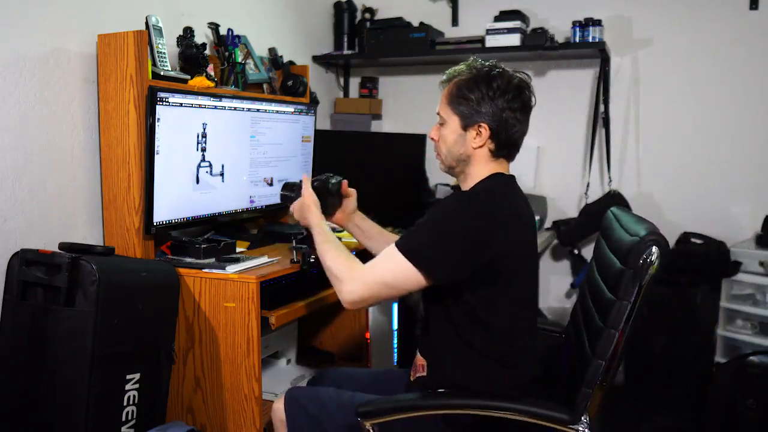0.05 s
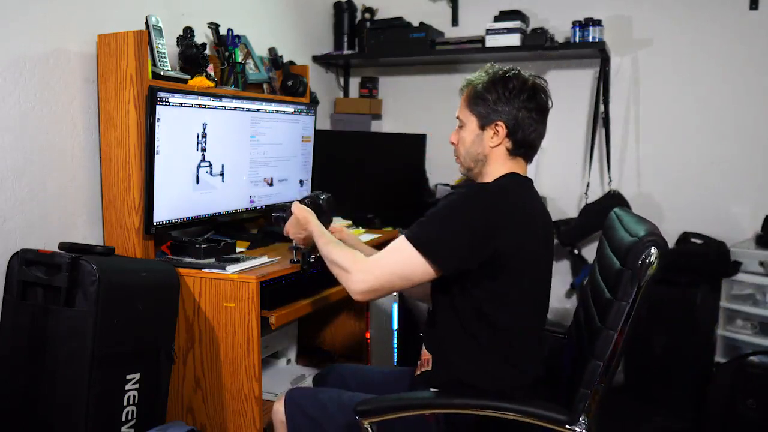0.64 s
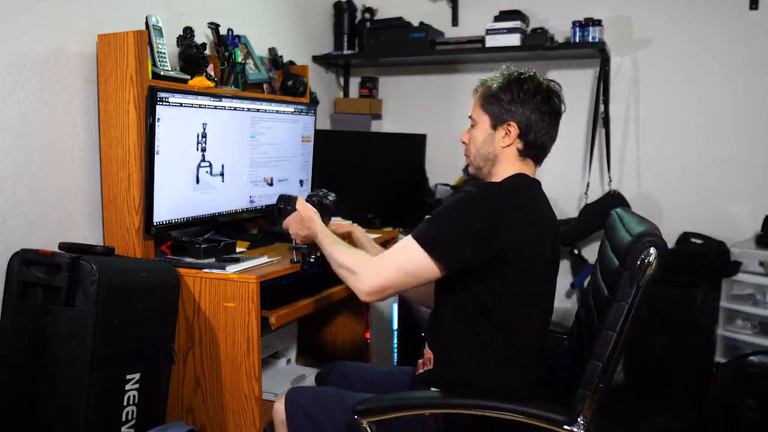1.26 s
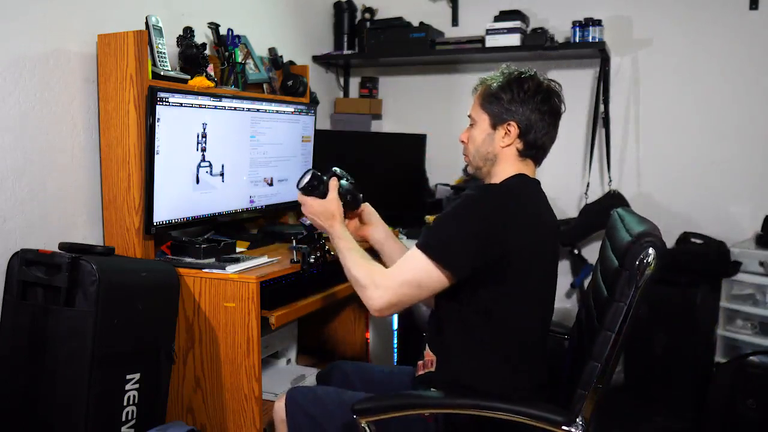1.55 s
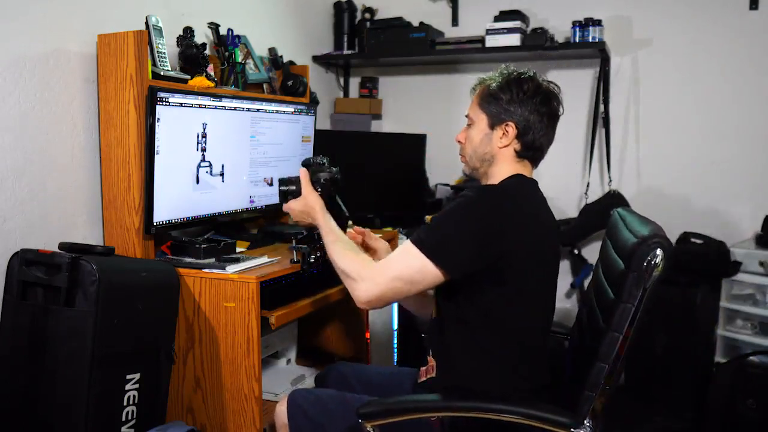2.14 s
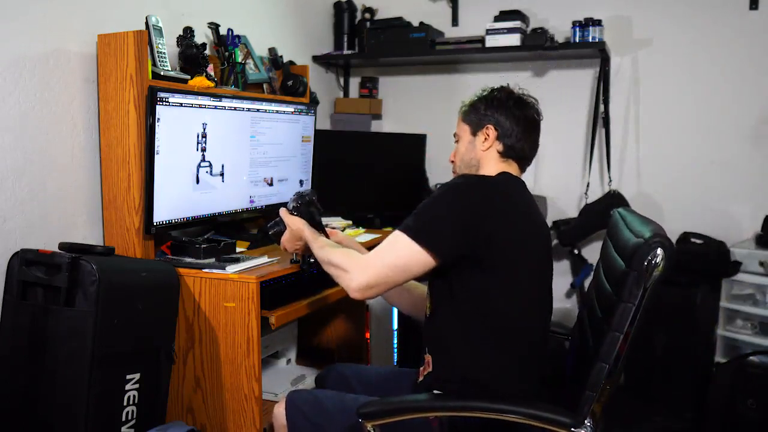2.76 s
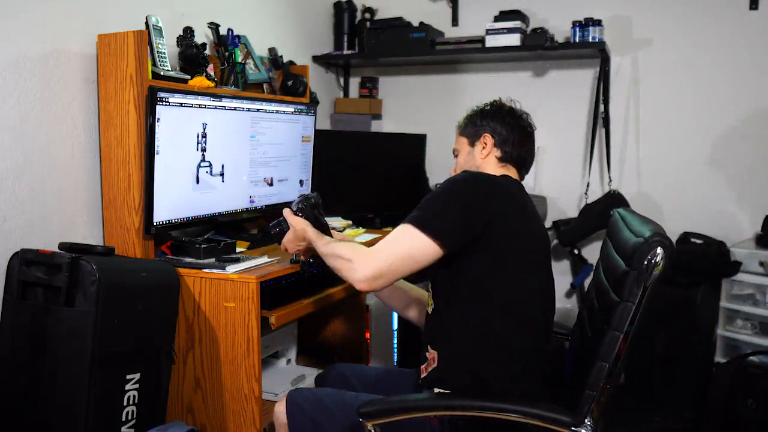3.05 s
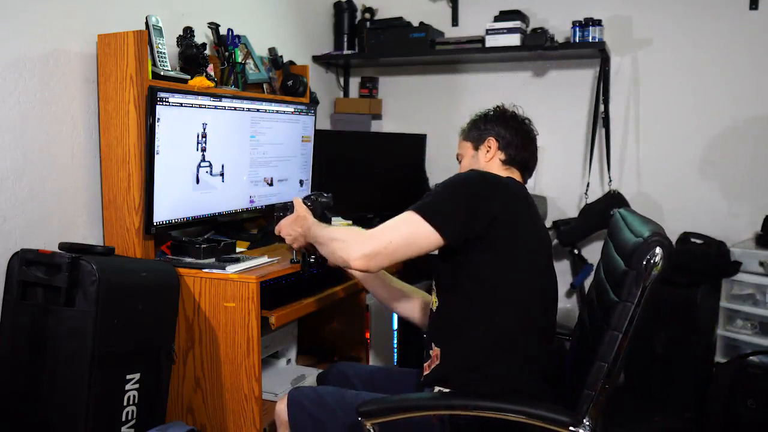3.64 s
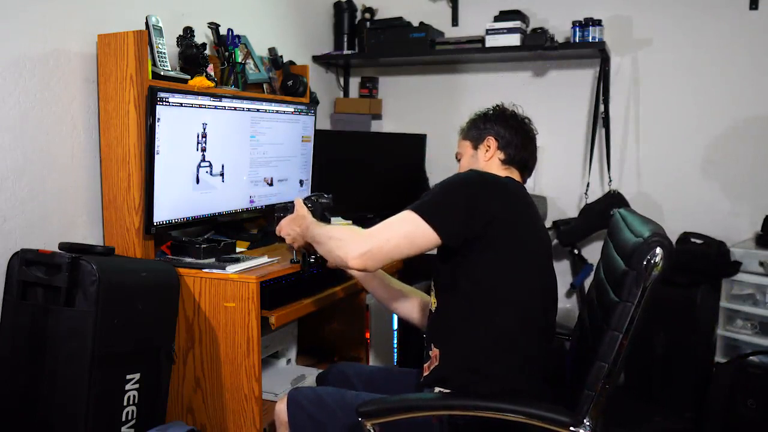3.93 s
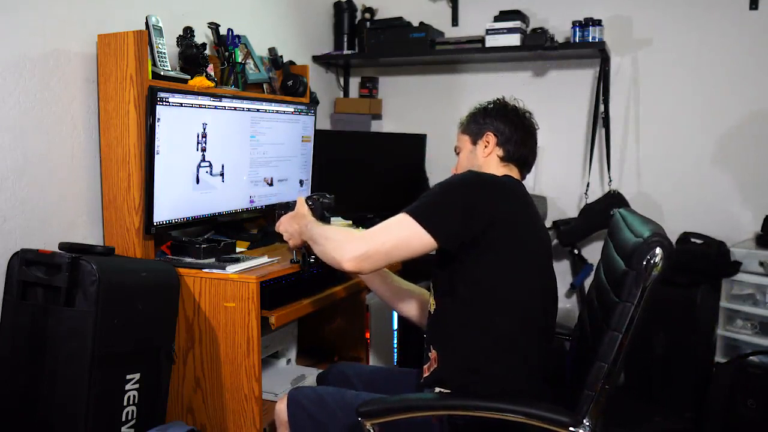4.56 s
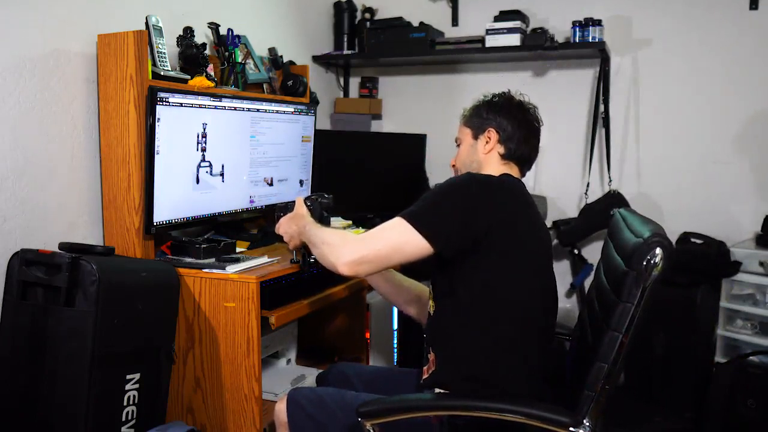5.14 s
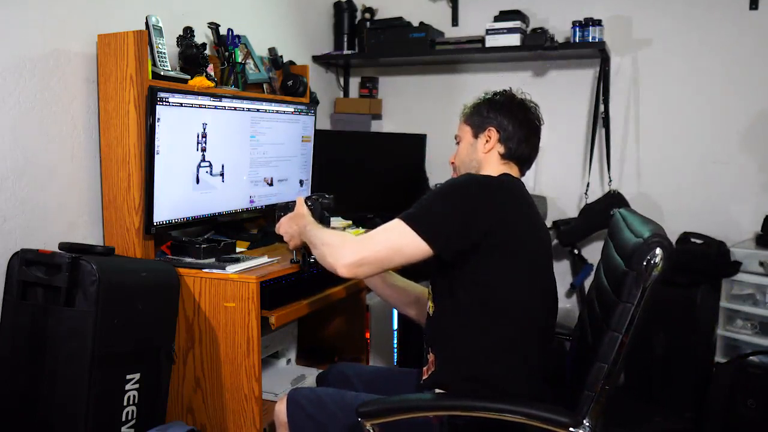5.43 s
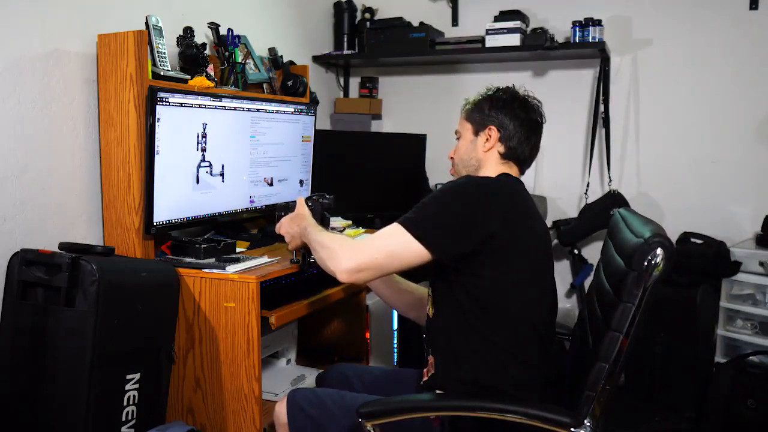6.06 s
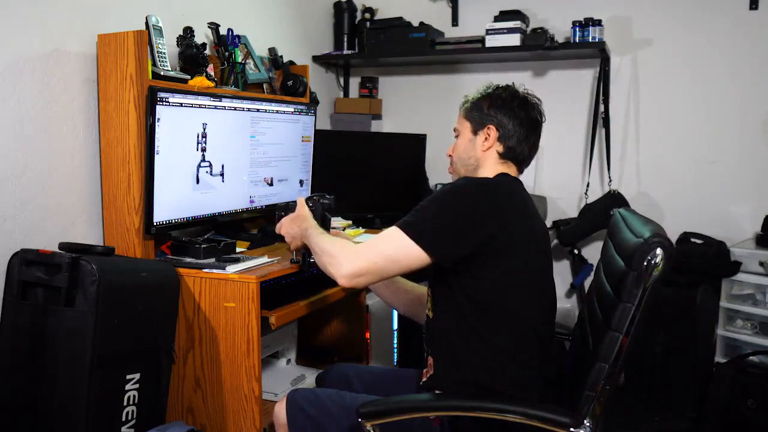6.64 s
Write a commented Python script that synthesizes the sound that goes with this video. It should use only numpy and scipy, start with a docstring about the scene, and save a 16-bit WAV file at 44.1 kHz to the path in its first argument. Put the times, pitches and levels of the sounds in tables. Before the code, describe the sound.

A camera is handled and knocked onto a small desk stand, then screwed down with short scrapes and clicks over a low computer hum.

```python
"""Fingers brush a camera, then it knocks onto a small stand on a wooden desk in a small room.
It is lifted, seated again and screwed down. Each impact excites damped modes: a tick at the edges,
a clack in the plastic body, a thud through stand and desk. Stick-slip friction makes the body creak,
the base groan as it slides home and the screw scrape in short turns. A computer hums underneath."""
import sys
import numpy as np
from scipy import signal
from scipy.fft import rfft, irfft, next_fast_len
from scipy.io import wavfile
from scipy.ndimage import uniform_filter1d

SR = 44100
rng = np.random.default_rng(int(sys.argv[2]) if len(sys.argv) > 2 else 0)


def master(y):
    """Save y as 16-bit WAV."""
    cut = np.clip(np.atleast_2d(y).T, -1, 1)
    pcm = np.round(cut * 32767)  # scale
    wavfile.write(sys.argv[1], SR, pcm.astype(np.int16))


N = 303849
TIME = np.arange(N) / SR

# Spectra of the plastic shell, hard edges and shaken stand. Each row: frequency in Hz, density in dB.
SHELL_SPECTRUM = [(300, -13), (700, 0), (1000, 6), (1400, 4), (1900, -5.5), (2400, -2), (3200, -8.5),
                  (4200, -12), (5500, -28), (7000, -19), (11000, -48), (16000, -61)]
TICK_SPECTRUM = [(1000, -57), (3000, 10), (5000, 5.5), (6600, -2.5), (8000, 4.5), (9700, 4.5), (11000, 0),
                 (14000, 5), (16000, -10)]
RUMBLE_SPECTRUM = [(50, -41), (110, 0), (170, -6.5), (260, -3), (340, 2.5), (400, -3), (490, -1.5),
                   (650, -11.5), (850, -13), (1500, -31.5), (16000, -83)]


def impacts(shake_db=-14.5, shake_rise_s=0.0027, thud_lag_s=0.00204):
    """Impulsive excitation: knocks and clicks give low thuds and bright clacks, returned separately."""
    # Camera on stand. Each row: start in seconds, thud level in dB, thud centre in Hz, clack level in dB,
    # tick level in dB, tick cutoff in Hz, clack T60 in seconds.
    knocks = [(0.5004, -24.5, 253, -33, -39, 10500, 0.034), (0.5419, -35.5, 262, -44, -50, 10100, 0.083),
              (0.7611, -40.5, 435, -42.5, -53.5, 8900, 0.016), (0.823, -44.5, 348, -53, -80, 9100, .045),
              (.895, -45, 404, -60, -78, 9000, 0.033), (.934, -42, 376, -63, -65, 10000, 0.039),
              (0.9538, -51, 312, -45.5, -53.5, 9400, 0.035), (0.979, -36, 310, -41, -70, 9100, 0.024),
              (3.1392, -29.5, 364, -34.5, -46.5, 8000, 0.025), (3.2, -41.5, 376, -56.5, -78, 10000, .025),
              (3.4105, -47, 400, -56, -78, 14000, .05), (3.468, -38.5, 360, -49.5, -58, 9600, 0.023),
              (3.7213, -23, 464, -30, -42, 11600, 0.052), (3.7471, -49, 368, -31.5, -65, 11000, 0.035),
              (3.7553, -28.5, 335, -31, -45.5, 10200, 0.043), (4.0787, -51, 450, -64, -70, 13000, .026),
              (4.4338, -41.5, 415, -46.5, -60, 10500, 0.029), (4.7949, -41, 392, -45, -54, 10600, 0.033),
              (5.0998, -39.5, 300, -41, -55.5, 11400, 0.073), (5.2795, -52, 305, -53, -69, 13000, 0.052),
              (5.3709, -47, 363, -47, -59, 12100, 0.044), (5.4396, -49, 357, -52, -70, 13000, 0.063),
              (5.5036, -37, 397, -33, -48, 12900, 0.025), (6.2885, -60, 413, -50, -74, 10300, 0.064),
              (6.3396, -42.5, 264, -58, -82, 9000, .034)]
    # The camera's own parts. Each row: start in seconds, clack level in dB, clack centre in Hz,
    # tick level in dB, clack T60 in seconds.
    clicks = [(.402, -54.5, 1570, -82, 0.074), (.639, -49, 1410, -49, 0.012),
              (.657, -53.5, 1500, -63, 0.0074), (1.3484, -75, 2010, -66, .025),
              (1.3717, -56.5, 2480, -59.5, 0.023), (1.4528, -46, 1230, -65, 0.034),
              (1.6034, -56.5, 1400, -59.5, 0.024), (1.6903, -55, 1500, -56.5, 0.015),
              (1.8229, -41.5, 1250, -43.5, 0.0096), (1.846, -43, 1400, -53.5, .08),
              (1.9162, -73, 1600, -58.5, .017), (2.135, -35.5, 1360, -52.5, 0.0057),
              (2.9034, -57.5, 1340, -68, 0.0092), (3.179, -56, 1300, -59, .03),
              (3.762, -45, 1400, -45.5, 0.027), (4.0347, -56.5, 1630, -63.5, 0.014),
              (6.3655, -55, 1680, -76, 0.039)]
    # The whole desk shaking. Each row: frequency in Hz, relative level in dB, T60 in seconds.
    frame_modes = [(81.4, 0, 0.17), (126.4, -1, 0.15), (169.4, -2.5, 0.19)]
    t = np.arange(SR // 4) / SR
    low, bright = np.zeros(N), np.zeros(N)
    for start, thud_db, thud_hz, clack_db, tick_db, top_hz, t60 in knocks:
        shake = unit(ring(frame_modes, t) * (1 - np.exp(-t / shake_rise_s)), 0.042)
        desk = thud(t, thud_hz) + from_db(shake_db) * shake
        add(low, start + thud_lag_s, from_db(thud_db) * desk)  # the blow first travels down the stand
        add(bright, start, from_db(clack_db) * clack(t, t60, centre_hz=1420))
        add(bright, start, from_db(tick_db) * tick(t, t60, top_hz))
    for start, clack_db, clack_hz, tick_db, t60 in clicks:
        desk = thud(t, centre_hz=378) * np.exp(-t / t60)
        add(low, start, from_db(clack_db - 5.5) * desk)  # little of a click reaches the desk
        add(bright, start, from_db(clack_db) * clack(t, t60, clack_hz))
        add(bright, start, from_db(tick_db) * tick(t, t60, top_hz=12200))
    return low, bright


def thud(t, centre_hz, focus=2.46, rise_cycles=1.11, loose_t60=0.065, damp_s=0.07):
    """Modal response: a blow favours the desk's modes near its centre frequency; loose parts blur it."""
    # Stand and desk top. Each row: frequency in Hz, relative level in dB, T60 in seconds.
    desk_modes = [(171, -16, 0.07), (208, -10.5, 0.061), (255.4, 6, 0.046), (327.3, -3, 0.084),
                  (375.3, -3.5, 0.063), (458, 3, 0.047), (505, -16.5, 0.17), (594, -16, 0.12),
                  (792, -9.5, 0.19), (1117, -5.5, 0.044)]
    ratio = np.array(desk_modes)[:, 0] / centre_hz
    weight_db = -10 * np.log10(1 + (focus * (ratio - 1 / ratio)) ** 2)
    wood = unit(ring(desk_modes, t, weight_db), 0.02)
    rattle = colour(rng.standard_normal(len(t)), RUMBLE_SPECTRUM, np.sqrt(centre_hz / 340))
    loose = unit(rattle * from_db(-60 * t / loose_t60), 0.017)
    swell = 1 - np.exp(-(t * centre_hz / rise_cycles) ** 2)
    held = from_db(-9) + np.exp(-(t / damp_s) ** 2)  # the hands soon damp most of the motion
    return unit((wood + from_db(-12) * loose) * swell * held, 0.017)


def clack(t, t60, centre_hz, head_db=-6, head_rise_s=0.00095):
    """Coupled vibration: the plastic shell is struck and the stand's head answers with a short ring."""
    # The head alone. Each row: frequency in Hz, relative level in dB, T60 in seconds before added damping.
    head_modes = [(1167, -1.5, 0.049), (1380, 7, 0.025), (1475, 4, 0.042), (1610, -2.5, 0.06),
                  (2187, -8.5, 0.13)]
    shell = unit(crack(t, t60, SHELL_SPECTRUM, np.sqrt(centre_hz / 1600)), 0.0052)
    envelope = (1 - np.exp(-t / head_rise_s)) * np.exp(-t / t60)
    head = unit(ring(head_modes, t) * envelope, 0.0026)
    return shell + from_db(head_db) * head


def tick(t, clack_t60, top_hz):
    """Brief contact has a wide spectrum: hard edges give a bright tick that dies sooner than the clack."""
    lowpass = signal.butter(3, min(top_hz / SR * 2, 0.9))
    edges = crack(t, 0.77 * clack_t60, TICK_SPECTRUM)
    return unit(signal.lfilter(*lowpass, edges), 0.0063)


def crack(t, t60, spectrum, shift=1):
    """High modal density: after an impulse, a small part's crowded modes act as decaying noise."""
    burst = rng.standard_normal(len(t)) * from_db(-60 * t / t60)
    burst[0] += 0.33
    return colour(burst, spectrum, shift)


def clinks(plate_rise_s=0.0066):
    """Free vibration of struck metal: the screw pings at once and the plate swells after it."""
    # Metal strikes metal. Each row: start in seconds, level in dB.
    strikes = [(.5015, -37), (3.7215, -65)]
    # Screw and plate. Each row: frequency in Hz, relative level in dB, T60 in seconds.
    screw_modes = [(2950, -12, 0.07), (3770, -1, 0.035), (4780, 9, 0.019), (5950, -9, .04),
                   (7800, 4.5, 0.022)]
    plate_modes = [(628, -6, 0.14), (786, -1, 0.11), (860, -5, 0.09), (1038, -13.5, 0.12)]
    t, out = np.arange(SR // 4) / SR, np.zeros(N)
    for start, db in strikes:
        plate = unit(ring(plate_modes, t) * (1 - np.exp(-t / plate_rise_s)), 0.014)
        ping = unit(ring(screw_modes, t), 0.0086)
        add(out, start, from_db(db) * (ping + plate))
    return out


def groan(jitter=0.04, flutter_db=1):
    """Stick-slip oscillation near a mode of the stand gives a short, shaky, nearly pure tone."""
    # The base on the plate. Each row: time in seconds, level in dB, slips per second.
    slip_curve = [(3.407, -50, 420), (3.417, -36, 385), (3.44, -38, 335), (3.462, -34, 350),
                  (3.478, -29, 330), (3.495, -39, 335), (3.507, -37, 345), (3.524, -52, 325)]
    times, _, hz = np.transpose(slip_curve)
    cycles = np.cumsum(np.interp(TIME, times, hz) * (1 + jitter * drift(110))) / SR
    phase = 2 * np.pi * cycles
    overtones = sum(from_db(-12.5 - 5 * k) * np.sin(k * phase) for k in range(2, 8))
    tone = unit(np.sin(phase) + overtones) * from_db(flutter_db * drift(60))
    return tone * level(slip_curve)


def base_and_screw(rumble_db=-1.5, slide_scrape_db=-19.5, grit_db=1.5):
    """Sliding friction: the moving base and each twist of the screw shake the stand and rasp the plate."""
    # Hand movements. Each row: start, swell and fade in seconds, relative level in dB.
    slides = [(.8, 0.13, 0.085, -42), (3.37, 0.092, 0.052, -40.5), (3.64, 0.076, 0.072, -35),
              (4.0, .08, 0.049, -54)]
    twists = [(4.241, 0.012, 0.066, -48), (4.35, 0.012, 0.24, -68), (4.63, 0.027, 0.13, -53.5),
              (4.97, 0.077, 0.11, -53), (5.346, 0.024, 0.043, -52), (5.42, 0.043, 0.059, -48.5),
              (5.71, .1, 0.074, -53.5), (6.139, 0.033, 0.052, -53), (6.23, 0.049, 0.037, -50.5),
              (6.4, 0.016, .11, -60.5), (6.68, 0.062, 0.027, -60.5)]
    sliding = strokes(slides)
    # The stand settles more slowly than the twist that shakes it.
    shaking = strokes([(start, swell, 1.6 * fade, db + 1.5) for start, swell, fade, db in twists])
    rumble = unit(colour(grains(per_s=700, spread_db=1), RUMBLE_SPECTRUM)) * (sliding + shaking)
    base = from_db(slide_scrape_db) * sliding * rasp()  # flat faces rumble more than they rasp
    screw = sum(strokes([twist]) * rasp(wander=0.03) for twist in twists)
    grit = unit(from_db(grit_db * drift(29)))  # the thread catches and runs free
    return from_db(rumble_db) * rumble + (base + screw) * grit


def rasp(wander=0):
    """Forced resonance: metal slips ring the plate, whose modes the hand's pressure shifts a little."""
    # Metal slipping on metal. Each row: frequency in Hz, density in dB.
    scrape_spectrum = [(200, -37), (500, -5.5), (700, -10), (1150, -2), (1500, 1), (1800, -10),
                       (2100, -3.5), (3400, -11.5), (5600, -23.5), (6700, -29), (8500, -28.5), (11000, -22),
                       (16000, -40)]
    # The plate. Each row: frequency in Hz, bandwidth in Hz, gain in dB relative to the plain slips.
    resonances = [(803, 44, 19.5), (1430, 170, 2), (2506, 26, 12.5), (3660, 96, -7), (5080, 67, 9),
                  (8960, 390, 7)]
    slips = colour(grains(per_s=1500, spread_db=3.6), scrape_spectrum)
    shifts = 1 + wander * rng.uniform(-0.73, 1, len(resonances))
    plate = sum(from_db(db) * resonate(slips, hz * shift, width)
                for (hz, width, db), shift in zip(resonances, shifts))
    return unit(slips + plate)


def knob(t60=0.024):
    """Sudden release: the screw's plastic knob slips from the fingers with a dry, bright snap."""
    # Releases. Each row: start in seconds, level in dB.
    snaps = [(4.4337, -45.5), (4.7952, -39)]
    # The knob's response. Each row: frequency in Hz, density in dB.
    knob_spectrum = [(2000, -7), (3400, -6), (4100, -7), (4600, -13), (5200, -9), (5800, -17), (6600, -30),
                     (16000, -33)]
    t, out = np.arange(SR // 10) / SR, np.zeros(N)
    for start, db in snaps:
        add(out, start, from_db(db) * unit(crack(t, t60, knob_spectrum), 0.0063))
    return out


def creak(slips_per_s=330, unevenness=0.65):
    """Stick-slip under the grip: an uneven pulse train rings two modes of the plastic shell."""
    # The creak's envelope. Each row: time in seconds, level in dB.
    envelope = [(1.824, -60), (1.837, -39.5), (1.853, -40), (1.867, -42), (1.882, -69)]
    cycles = np.cumsum(slips_per_s * np.exp(unevenness * drift(300))) / SR
    slips = np.diff(np.floor(cycles), prepend=0) * rng.uniform(0.73, 1, N)
    low_mode = resonate(slips, hz=1330, width_hz=350)
    high_mode = resonate(slips, hz=2250, width_hz=350)
    return unit(colour(low_mode - from_db(-2) * high_mode, SHELL_SPECTRUM)) * level(envelope)


def squeaks(rise_share=0.098):
    """Friction noise drives one resonance per squeak, swelling quickly and fading."""
    # Sliding parts. Each row: start and length in seconds, frequency and bandwidth in Hz, level in dB.
    rubs = [(0.4, .06, 7400, 600, -78), (.398, .046, 10500, 1400, -70.5), (.868, 0.2, 2530, 300, -69),
            (1.962, 0.12, 3750, 200, -78), (2.747, 0.03, 2250, 400, -63.5),
            (3.435, 0.066, 2170, 400, -61.5), (3.691, 0.029, 1700, 1400, -54.5),
            (4.254, 0.018, 5600, 600, -64), (4.267, 0.063, 1360, 700, -50.5),
            (5.435, 0.018, 5100, 200, -64), (5.496, 0.019, 3170, 2980, -53),
            (5.767, 0.08, 2750, 900, -64.5), (6.279, 0.022, 9100, 1200, -65.5)]
    out = np.zeros(N)
    for start, length, hz, width, db in rubs:
        progress = np.linspace(0, 1, int(length * SR))
        friction = rng.standard_normal(SR)[:len(progress)]
        tone = resonate(resonate(friction, hz, width), hz, width)
        envelope = (1 - np.exp(-progress / rise_share)) * (1 - progress)
        add(out, start, from_db(db) * unit(tone * envelope))
    return out


def fingers(swish_gain_db=0.5, hiss_gain_db=-1, swell_share=0.36, fade_share=0.38):
    """Roughness noise: skin brushing textured plastic makes a soft, grainy swish and a thin hiss."""
    # Finger strokes. Each row: start and nominal length in seconds, relative swish and hiss levels in dB.
    brushes = [(0, 0.023, -52, -81), (0.079, 0.045, -50, -53.5), (0.204, 0.024, -54.5, -63),
               (0.225, 0.023, -56, -62), (0.404, 0.035, -61, -78), (0.438, 0.18, -60.5, -69),
               (0.574, 0.091, -64, -79), (1.274, 0.038, -65, -64), (1.403, .05, -63, -83),
               (1.456, 0.042, -64, -59.5), (1.493, 0.061, -58, -67), (1.637, 0.041, -63, -61.5),
               (1.87, 0.22, -62.5, -71), (2.043, 0.042, -64.5, -70), (2.112, 0.073, -56, -63),
               (2.2, 0.089, -60.5, -73), (2.48, 0.049, -79, -69), (3.299, 0.041, -57, -60)]
    # Rubbing skin. Each row: frequency in Hz, density in dB.
    skin_spectrum = [(400, 3), (1300, 5), (2000, 2), (3600, -3), (5500, -11), (9000, -15), (13000, -19),
                     (16000, -35)]
    swish = strokes([(s, span * swell_share, span * fade_share, db) for s, span, db, _ in brushes])
    hiss = strokes([(s, span * swell_share, span * fade_share, db) for s, span, _, db in brushes])
    skin = unit(colour(grains(per_s=4900, spread_db=5.5), skin_spectrum))
    texture = unit(colour(grains(per_s=1700, spread_db=2.5), TICK_SPECTRUM))
    return from_db(swish_gain_db) * skin * swish + from_db(hiss_gain_db) * texture * hiss


def room(x, wet_db, gap_s=0.0028, echoes_per_s=3000):
    """Reverberation: sparse reflections from desk, screen and walls die at a different rate per band."""
    # The room's decay. Each row: frequency in Hz, T60 in seconds.
    decay_times = [(100, 0.29), (400, 0.23), (1500, 0.18), (5000, 0.21), (15000, 0.16)]
    echoes = rng.choice([-1., 1.], SR // 2) * (rng.random(SR // 2) < echoes_per_s / SR)
    hz, t, bands = signal.stft(echoes, SR, nperseg=256)
    decay = from_db(-60 * t / read(decay_times, hz)[:, None])
    tail = signal.istft(bands * decay, SR, nperseg=256)[1]
    tail = np.r_[np.zeros(int(gap_s * SR)), tail]
    return x + from_db(wet_db) * signal.fftconvolve(x, tail / np.linalg.norm(tail))[:N]


def computer(hum_hz=40, hum_db=-49, air_db=-57.5):
    """Tonal and broadband noise: a low, slightly wavering hum lies under the steady air of the fans."""
    # Fan air. Each row: frequency in Hz, density in dB.
    air_spectrum = [(8, -57), (15, -1), (30, -1), (48, -2.5), (62, -17.5), (80, -13), (120, -19),
                    (190, -14.5), (400, -23), (500, -17.5), (700, -24), (1090, -26.5), (3400, -45),
                    (16000, -52)]
    hum = unit(np.sin(2 * np.pi * hum_hz * TIME) * (1 + 0.12 * drift(1.5)))
    size = next_fast_len(N)
    hz = np.fft.rfftfreq(size, 1 / SR)
    air = rfft(rng.standard_normal(size)) * from_db(read(air_spectrum, hz))
    audible_rms = irfft(air * (hz > 60), size).std()
    return from_db(hum_db) * hum + from_db(air_db) * irfft(air, size)[:N] / audible_rms


def ring(modes, t, weight_db=0):
    """Modal superposition: damped sines, each struck with a slightly different strength."""
    hz, db, t60 = np.transpose(modes)
    gain = from_db(db + weight_db + rng.standard_normal(len(hz)))
    return gain @ (np.sin(2 * np.pi * hz[:, None] * t) * from_db(-60 * t / t60[:, None]))


def resonate(x, hz, width_hz):
    """A second-order resonance with peak gain 1."""
    return signal.lfilter(*signal.iirpeak(hz, hz / width_hz, fs=SR), x)


def colour(x, spectrum, shift=1, size=4096):
    """A minimum-phase filter with the given spectrum, scaled in frequency by shift."""
    hz = abs(np.fft.fftfreq(size, 1 / SR))
    log_gain = np.log(from_db(np.maximum(read(spectrum, hz / shift), -100)))
    response = np.exp(np.conj(signal.hilbert(log_gain)))
    taps = np.fft.ifft(response).real[:size // 2]
    return signal.fftconvolve(x, taps)[:len(x)]


def grains(per_s, spread_db):
    """Shot noise: tiny slips at random moments, a few much larger than the rest."""
    size = from_db(spread_db * np.minimum(rng.exponential(1, N), 4))
    return unit(size * rng.standard_normal(N) * (rng.random(N) < per_s / SR))


def drift(rate_hz):
    """Low-passed noise: a smooth random fluctuation of rms 1."""
    size = next_fast_len(N)
    hz = np.fft.rfftfreq(size, 1 / SR)
    slow = rfft(rng.standard_normal(size)) / (1 + (hz / rate_hz) ** 4)
    return unit(irfft(slow, size)[:N])


def strokes(rows):
    """Envelope of hand movements: each gathers speed, then decays exponentially."""
    t, gain = np.arange(SR) / SR, np.zeros(N)
    for start, swell, fade, db in rows:
        rise = np.sin(np.pi / 2 * np.minimum(t / swell, 1)) ** 2
        add(gain, start, from_db(db) * rise * np.exp(-np.maximum(t - swell, 0) / fade))
    return gain


def level(rows):
    """Envelope from a dB curve, silent outside it, with softened ends."""
    rows = np.array(rows)
    gain = from_db(np.interp(TIME, rows[:, 0], rows[:, 1], left=-120, right=-120))
    return uniform_filter1d(gain, size=200)


def from_db(db):
    """Decibels to amplitude gain."""
    return 10 ** (np.asarray(db) / 20)


def unit(x, span_s=None):
    """Normalises to rms 1, over all of x or its first span_s seconds."""
    head = x if span_s is None else x[:int(span_s * SR) + 1]
    return x / np.sqrt(np.mean(head ** 2) + 1e-20)


def read(points, hz):
    """Interpolates a table on a log-frequency axis."""
    freqs, values = np.transpose(points)
    return np.interp(np.log(hz + 1), np.log(freqs), values)


def add(mix, start_s, sound):
    """Superposes a sound on the mix from start_s."""
    part = mix[max(round(start_s * SR), 0):][:len(sound)]
    part += sound[:len(part)]


def scene():
    """Superposition: the handling sounds and their reverberation add to the computer's noise."""
    low, bright = impacts()
    rubbing = base_and_screw() + fingers() + creak() + squeaks()
    handling = room(low + groan(), wet_db=-10) + room(bright + clinks() + knob() + rubbing, wet_db=-8.5)
    return (handling + computer())[None]


def record(dry):
    """Band limiting: a linear-phase low-pass removes the highest treble."""
    lowpass = signal.firwin(511, cutoff=15900, window=("kaiser", 9), fs=SR)
    return signal.oaconvolve(dry, lowpass[None], "same")


dry = scene()
out = record(dry)
master(out)
```